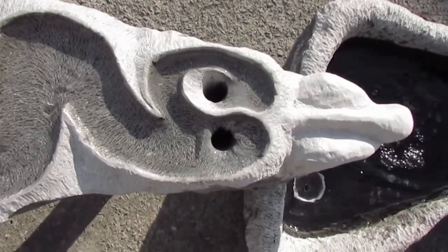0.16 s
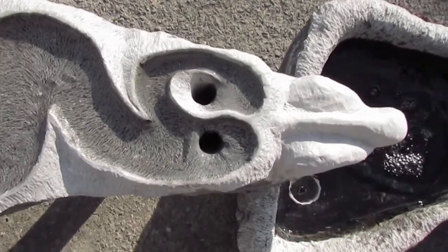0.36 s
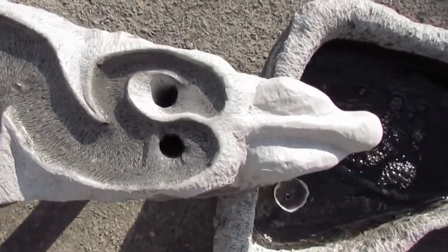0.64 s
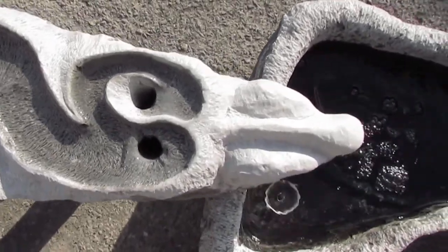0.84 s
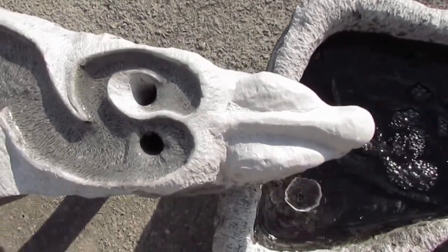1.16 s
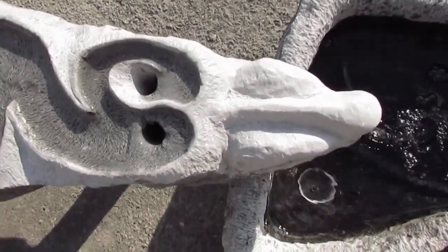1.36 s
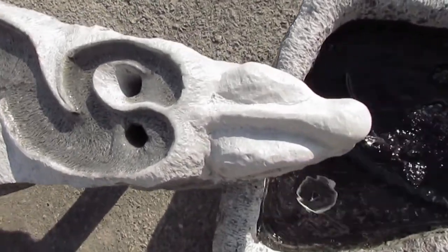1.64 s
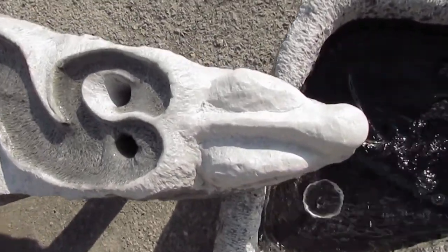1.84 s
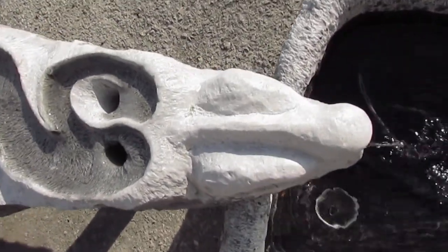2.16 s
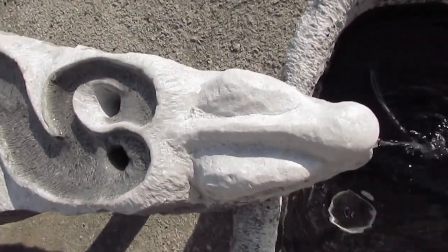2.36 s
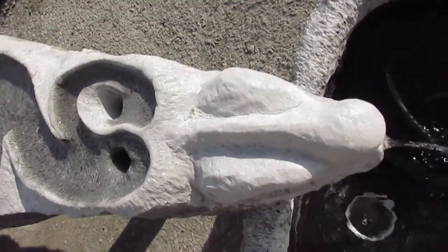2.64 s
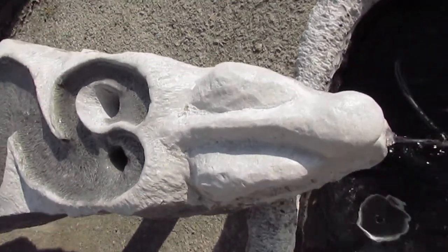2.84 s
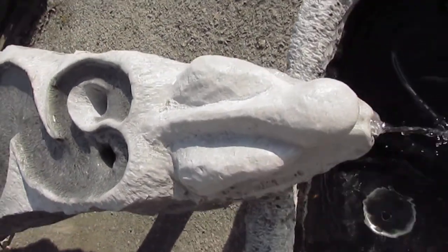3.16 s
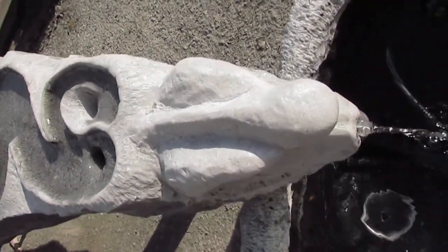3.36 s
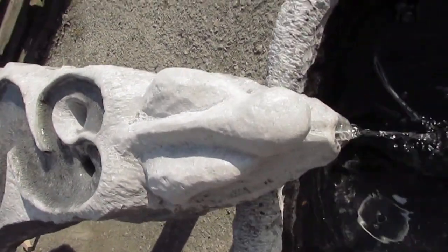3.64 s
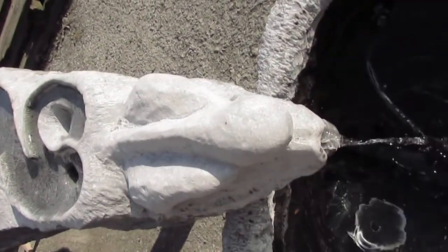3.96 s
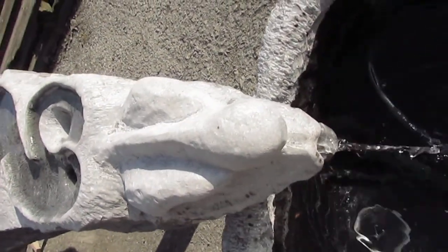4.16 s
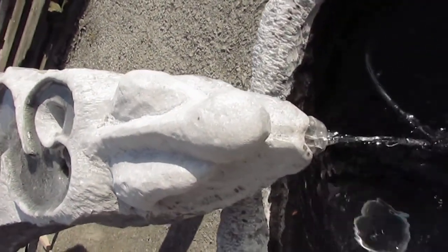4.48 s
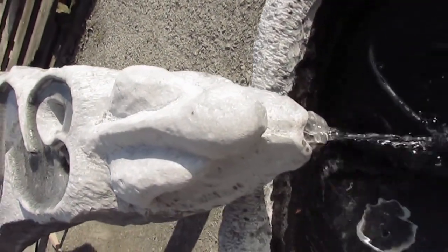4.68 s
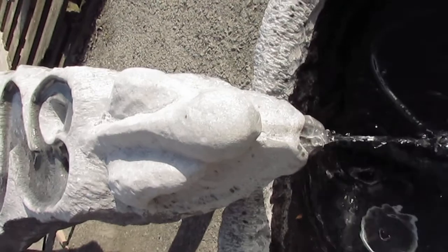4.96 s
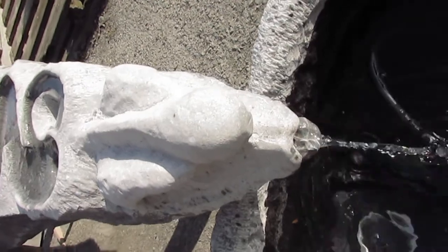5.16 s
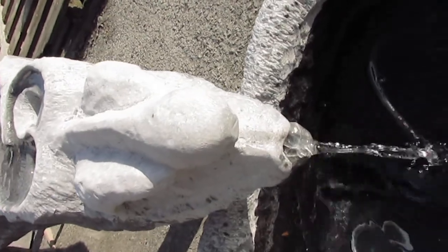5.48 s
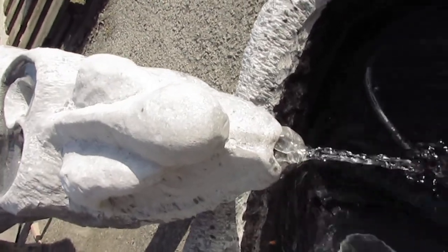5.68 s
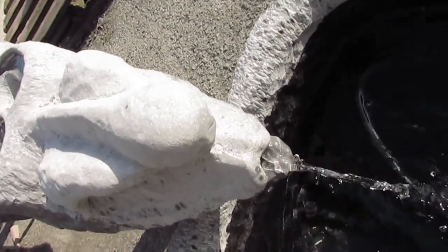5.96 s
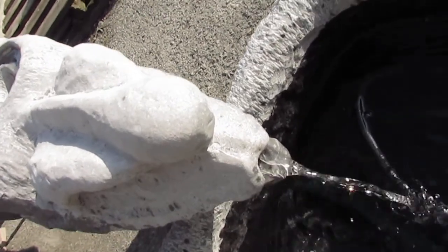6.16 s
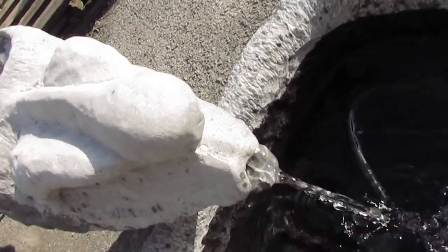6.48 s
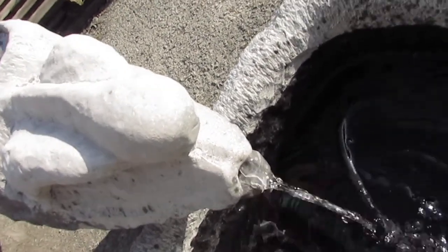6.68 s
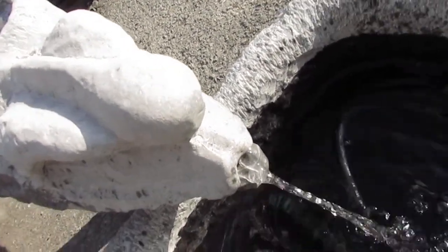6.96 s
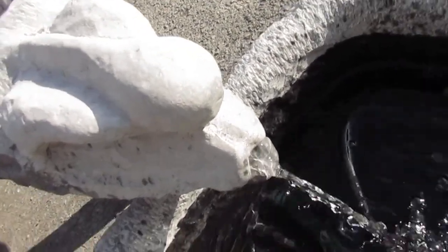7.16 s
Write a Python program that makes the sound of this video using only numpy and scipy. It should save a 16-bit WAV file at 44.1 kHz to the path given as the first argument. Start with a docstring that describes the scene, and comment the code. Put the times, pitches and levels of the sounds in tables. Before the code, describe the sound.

Close outdoor sound of a thin water jet falling from a carved stone spout into a basin. Hollow, rounded plops and a constant run of small gulps sit over light splashing, bright bubble plinks and tiny spray ticks. The splash becomes clearer and brighter as the microphone moves past the spout. Wind thumps hit briefly, heaviest a little after five seconds, then the plops crowd together.

```python
"""Loud hollow plops over a run of small gulps near 500 Hz, in a thin splash: a jet falls from a stone spout.
Plops are decaying sines with stone-hollow modes; bubbles and spray pips are short, mostly rising chirps.
Drops are filtered noise bursts; the splash is noise slaps with bubble clusters, smeared by the basin.
The microphone moves out over the spout, so the splash spectrum crossfades from shaded to open.
Wind is band-shaped noise driven by timed gusts, with push-pull pulses for the eddies that thump."""
import sys
import numpy as np
from scipy import signal
from scipy.fft import rfft, irfft, next_fast_len
from scipy.io import wavfile
from scipy.ndimage import uniform_filter1d, minimum_filter1d, map_coordinates

SR = 44100
rng = np.random.default_rng(int(sys.argv[2]) if len(sys.argv) > 2 else 0)


def wrap_up_sound(samples):
    """Save the sound to the file named by the first command line argument, as 16-bit audio."""
    columns = np.atleast_2d(samples).T
    # keep every value between -1 and 1, then stretch to whole-number steps
    tamed = np.clip(columns, -1, 1)
    steps = np.round(tamed * 32767).astype(np.int16)
    wavfile.write(sys.argv[1], SR, steps)


N = 322812


def amp(db):
    """Decibels to gain."""
    return 10 ** (np.asarray(db) / 20)


def unit(x):
    """Scaled to rms 1."""
    return x / np.sqrt(np.mean(x ** 2) + 1e-20)


def crest(x):
    """Each row scaled to peak 1."""
    return x / np.abs(x).max(axis=-1, keepdims=True)


def fade(t_s, t60_s):
    """Exponential decay by 60 dB in t60_s."""
    return np.exp(-np.log(1000) * t_s / t60_s)


def along(points, hz):
    """Interpolate (freq_hz, value) points on a log frequency axis."""
    point_hz, value = np.transpose(points)
    return np.interp(np.log(hz + 1), np.log(point_hz + 1), value)


def columns(rows):
    """Columns of an event table, each shaped one row per event."""
    return np.transpose(rows)[:, :, None]


def clock():
    """Time of every sample in seconds."""
    return np.arange(N) / SR


def wobble(knots_per_s):
    """Smooth random curve through normally distributed knots."""
    knots = rng.standard_normal(4096)
    return map_coordinates(knots, [np.arange(N) * knots_per_s / SR], mode="wrap")


def filtered(x, response):
    """x times a zero-phase response of frequency."""
    size = next_fast_len(N + SR // 2)
    return irfft(rfft(x, size) * response(np.fft.rfftfreq(size, 1 / SR)), size)[:N]


def noise(spectrum):
    """Coloured noise of rms 1."""
    return unit(filtered(rng.standard_normal(N), lambda hz: amp(along(spectrum, hz))))


def recolour(x, spectrum):
    """x with its broad spectrum replaced by the given one, rms 1."""
    power = np.abs(rfft(x, next_fast_len(N + SR // 2))) ** 2
    broad = np.abs(uniform_filter1d(power, size=4000)) + power.mean() * 1e-4
    return unit(filtered(x, lambda hz: amp(along(spectrum, hz)) / np.sqrt(broad)))


def band(x, lo_hz, hi_hz):
    """Causal band-pass."""
    edges_hz = [lo_hz, min(hi_hz, SR / 2 - 1)]
    return signal.sosfilt(signal.butter(2, edges_hz, "band", fs=SR, output="sos"), x)


def place(start_s, waves):
    """Sum the rows of waves, each from its start time."""
    at = np.round(start_s * SR).astype(int) + np.arange(waves.shape[1])
    return np.bincount(np.maximum(at, 0).ravel(), waves.ravel(), N)[:N]


# outdoor air spectrum: freq_hz, density_db (relative)
AIR_SPECTRUM = [(20, -3.5), (60, -8.5), (150, -10), (300, -16.5), (1000, -17), (4000, -23), (9000, -34),
                (16000, -42.5)]


def air():
    """Still outdoor air: steady coloured noise, rms 1."""
    return noise(AIR_SPECTRUM)


def hiss(centre_s=0.72, width_s=0.051):
    """One brief, soft, high hiss: noise under a Gaussian swell."""
    swell = np.exp(-((clock() - centre_s) / width_s) ** 2)
    return amp(-49.0) * swell * noise([(3000, -34.5), (6000, -4), (9000, 0), (11000, -3), (16000, -32)])


# gusts that buffet the microphone: start_s, hold_s, strength_db
GUST_EVENTS = [(0.40, 0.046, -32.5), (0.57, 0.023, -38), (0.87, 0.033, -34.5), (1.53, 0.03, -37.5),
               (1.82, 0.02, -30), (2.52, 0.22, -38.5), (3.2, 0.18, -36), (3.62, 0.13, -48),
               (4.39, 0.092, -23), (4.59, 0.1, -24.5), (5.265, 0.092, -14), (5.38, 0.047, -19.5),
               (5.56, 0.11, -22.5), (5.72, 0.063, -20), (5.86, 0.12, -36), (6.3, 0.42, -43),
               (6.76, 0.1, -25.5), (6.94, 0.0075, -30.5), (7.27, 0.018, -25.5)]
GUST_RISE_DB_PER_S, GUST_FALL_DB_PER_S = 349, 377
WAKE_DB, WAKE_DB_PER_S = -16.5, 71  # weaker stirred air before and after each gust
BREEZE_DB, BREEZE_SWING_DB = -61, 4.5  # light air between gusts


def gust_strength():
    """Buffeting in dB: each gust rises, holds and falls inside a slower wake, over a light breeze."""
    start_s, hold_s, strength_db = columns(GUST_EVENTS)
    t = clock()
    before_s, after_s = np.maximum(start_s - t, 0), np.maximum(t - start_s - hold_s, 0)
    core_db = strength_db - GUST_RISE_DB_PER_S * before_s - GUST_FALL_DB_PER_S * after_s
    wake_db = strength_db + WAKE_DB - WAKE_DB_PER_S * (before_s + after_s)
    breeze_db = BREEZE_DB + BREEZE_SWING_DB * wobble(5.7)
    return np.maximum(np.maximum(core_db, wake_db).max(axis=0), breeze_db)


# eddies that hit the microphone: centre_s, level_db (before trim), pitch_hz
EDDY_THUMPS = [(0.408, -14, 86), (1.828, -17, 153), (2.69, -23.5, 126), (3.225, -26, 108), (4.398, -7, 193),
               (4.421, -13, 188), (4.457, -12.5, 121), (4.497, -9.5, 142), (4.598, -7, 197),
               (5.281, -6, 203), (5.311, 13.5, 300), (5.326, 9.5, 328), (5.524, -12, 250),
               (5.614, -10.5, 183), (5.728, -4, 228), (5.75, -3.5, 350), (6.765, -5, 255), (6.825, -9, 103),
               (7.28, -15.5, 97)]
# deep wind rumble spectrum: freq_hz, density_db (relative)
RUMBLE_SPECTRUM = [(12, 3), (30, 11.5), (80, 12), (150, -2.5), (250, -21.5), (400, -18), (900, -65.5)]


def wind():
    """Gusts rumble on the microphone; each strong eddy gives a quick push and pull of pressure."""
    centre_s, level_db, pitch_hz = columns(EDDY_THUMPS)
    half = SR // 40
    cycles = pitch_hz * np.arange(-half, half) / SR
    pulses = crest(np.sin(2 * np.pi * cycles) * np.exp(-(cycles / 0.47) ** 2))
    eddies = place(centre_s - half / SR, amp(level_db - 3.0) * pulses)
    gust_db = gust_strength()
    # stronger gusts shed smaller eddies: rumble levels off, then flutter; only roar keeps growing
    rumble = amp(np.minimum(gust_db - 1.0, -33)) * noise(RUMBLE_SPECTRUM)
    flutter_db = np.minimum(1.758 * gust_db + 13.5, -21.5)
    flutter = amp(flutter_db) * unit(band(air(), 102, 266) * amp(6.1 * np.tanh(wobble(45))))
    roar = amp(1.59 * gust_db - 4.5) * unit(band(air(), 216, 590))
    return eddies + rumble + flutter + roar


# diffuse decay of the yard: freq_hz, t60_s
YARD_DECAY = [(200, 0.35), (500, 0.51), (1000, 0.044), (4000, 0.065), (12000, 0.23)]


def yard(x):
    """Short diffuse answer of basin walls and ground: noise tail with frequency-dependent decay."""
    hz, t, bins = signal.stft(rng.standard_normal(SR // 2), SR, nperseg=256)
    tail = signal.istft(bins * fade(t, along(YARD_DECAY, hz)[:, None]), SR, nperseg=256)[1]
    delayed = np.pad(x, (SR // 200, 0))  # 5 ms
    return signal.fftconvolve(delayed, tail / np.linalg.norm(tail))[:N]


# splash flow; each layer adds its own trim: time_s, level_db
SPLASH_FLOW = [(0.0, -46.5), (0.5, -48), (0.9, -43.5), (1.3, -46), (2.8, -47), (3.4, -42.5), (4.9, -42),
               (7.32, -41)]


def flow_db(time_s):
    """Flow level that sets the splash and the layers that follow it."""
    return np.interp(time_s, *np.transpose(SPLASH_FLOW))


VIEW_START_S, VIEW_RISE_S = 2.64, 2.6


def in_view(time_s):
    """How far the splash has come out from behind the spout, 0-1."""
    return np.clip((time_s - VIEW_START_S) / VIEW_RISE_S, 0, 1)


def chirp(start_s, level_db, pitch_hz, cycles, rise, rough, size=800):
    """Bubbles swell, ring unevenly and mostly climb in pitch as they near the surface."""
    t = np.arange(size) / SR
    life, climb = columns(rng.standard_normal((len(start_s), 2)))
    t60_s = cycles * np.exp(0.36 * life) / pitch_hz
    glide_hz = pitch_hz * (1 + rise * (0.505 + climb) * np.minimum(t / t60_s, 1))
    # churning water shakes the bubble wall and blurs its note
    shake = unit(uniform_filter1d(rng.standard_normal(glide_hz.shape), size=40, axis=1))
    phase = 2 * np.pi * np.cumsum(glide_hz * (1 + rough * shake), axis=1) / SR
    swell = 1 - np.exp(-t * pitch_hz / 2)
    return place(start_s, amp(level_db) * crest(np.sin(phase) * fade(t, t60_s) * swell))


def spray(count=700):
    """Fine droplets patter back with needle ticks and trap tiny short-lived bubbles."""
    when, size, tune, hard = columns(rng.random((count, 4)))
    start_s = when * N / SR
    pip_db, pip_hz = 24 * size ** 4 - 11 * tune, 5500 + 7500 * tune
    pips = chirp(start_s, pip_db, pip_hz, cycles=105, rise=0.12, rough=0.12, size=300)
    t = np.arange(SR // 200) / SR
    ticks = rng.standard_normal((count, len(t))) * fade(t, 0.004)
    needles = band(place(start_s, amp(28 * hard ** 5) * ticks), 7100, 16000)
    level_db = flow_db(clock())
    return amp(1.286 * level_db - 1.0) * unit(pips) + amp(level_db - 20.5) * unit(needles)


def glugs(count=300):
    """Middle-sized bubbles drift up with soft, mostly rising notes."""
    when, size, tune = columns(rng.random((count, 3)))
    pitch_hz = 750 * 2 ** (1.7 * tune)
    notes = chirp(when * N / SR, 10 * size, pitch_hz, cycles=79, rise=0.363, rough=0.053, size=3600)
    return amp(flow_db(clock()) - 7) * unit(notes)


STRAY_DB, STRAY_SPREAD_DB = 8.5, 10.5  # lowest offset from the flow level, and range above it


def strays(count):
    """Random moments spread through the scene, with levels that follow the flow."""
    when, size = rng.random((count, 2)).T
    start_s = (np.arange(count) + when) * N / SR / count
    return start_s, flow_db(start_s) + STRAY_DB + STRAY_SPREAD_DB * size


def stray_drops(count=24, smack_db=-4, treble_db=-6.0):
    """Light drops at random moments, as rows for drops()."""
    start_s, level_db = strays(count)
    return np.column_stack([start_s, level_db + smack_db, treble_db + 3 * rng.standard_normal(count)])


# drops on water and stone: start_s, smack_db, treble_db (tick relative to smack, before trim)
DROP_IMPACTS = [(0.8866, -11.5, -45), (1.0201, -34, 6), (1.2674, -31, -5), (1.561, -22, -17),
                (1.6818, -30.5, 2.5), (2.0741, -39.5, -3), (2.5405, -25, -3), (2.8134, -26, -6),
                (2.8771, -29.5, -3), (3.3578, -20, -8.5), (3.5008, -15, -5), (3.6266, -22.5, -7.5),
                (3.7809, -24, -7.5), (3.9213, -34.5, 7), (4.0562, -23, -31), (4.3893, -31, 5),
                (4.632, -22.5, -7), (4.6616, -25.5, -2), (4.7918, -20.5, -6), (4.9172, -20, -22),
                (5.5452, -24, -3), (6.0214, -15, -38), (6.3299, -20, -37), (6.3789, -21.5, -16),
                (6.99, -24, -6), (7.0434, -23, -12)]


def drops():
    """Each impact is a dull smack and a bright tick: noise bursts with a fast and a slower decay."""
    start_s, smack_db, treble_db = columns(np.vstack([DROP_IMPACTS, stray_drops()]))
    t = np.arange(SR // 30) / SR

    def burst(t60_s, tail_db):
        """Noise with a quick decay plus a 23 ms tail."""
        decay = fade(t, t60_s) + amp(tail_db) * fade(t, 0.023)
        return rng.standard_normal((len(start_s), len(t))) * decay

    smack = crest(band(burst(t60_s=0.0046, tail_db=-6.0), 450, 3070))
    tick = crest(band(burst(t60_s=0.00064, tail_db=0), 4700, 8900))
    return place(start_s, amp(smack_db) * smack + amp(smack_db + treble_db + 3.5) * tick)


def stray_bubbles(count=26, shaded_hz=3300, open_hz=2450):
    """Plinks at random moments; their pitches centre lower as the splash comes into view."""
    start_s, level_db = strays(count)
    centre_hz = shaded_hz + (open_hz - shaded_hz) * in_view(start_s)
    return np.column_stack([start_s, level_db, centre_hz * np.exp(0.18 * rng.standard_normal(count))])


# single bubbles that ring out: start_s, peak_db, pitch_hz
BUBBLE_PLINKS = [(0.6947, -23.5, 3980), (0.93, -24, 3320), (0.99, -26, 3670), (1.432, -24.5, 3570),
                 (1.6835, -29, 4970), (2.1085, -25, 3140), (2.1154, -21, 3240), (2.199, -22, 3020),
                 (2.7188, -27.5, 3460), (3.1596, -19, 3480), (3.1899, -16.5, 2830), (3.4997, -16.5, 5030),
                 (4.152, -20.5, 6440), (4.6325, -20.5, 4970), (4.7113, -17, 3860), (4.9166, -23, 2490),
                 (5.1888, -23, 2350), (5.2798, -26, 4520), (5.3789, -19.5, 1850), (6.065, -19.5, 4380),
                 (6.1596, -17, 4380), (6.4377, -23.5, 2420), (6.5803, -21.5, 4200), (6.8895, -24.5, 2400)]


def bubbles():
    """Single plinks, each answered at once by the basin wall."""
    start_s, peak_db, pitch_hz = columns(np.vstack([BUBBLE_PLINKS, stray_bubbles()]))
    wall_delay_s = rng.uniform(0.001646, 0.0052, start_s.shape)
    direct = chirp(start_s, peak_db, pitch_hz, cycles=47, rise=0.05, rough=0.085)
    answer = chirp(start_s + wall_delay_s, peak_db - 7.5, pitch_hz, cycles=32, rise=0.24, rough=0.14)
    return direct + answer


# splash spectrum behind the stone spout: freq_hz, density_db (relative)
SHADED_SPECTRUM = [(410, -20), (700, -7), (997, -12), (1110, -12), (1280, -8.5), (1820, -12), (2730, -2),
                   (3110, -0.5), (3640, -3), (4430, -10.5), (5470, -6), (6400, -14), (13300, -27.5),
                   (16000, -48)]
# splash spectrum in plain view: freq_hz, density_db (relative)
OPEN_SPECTRUM = [(410, -50), (700, -29), (830, -40), (1020, -5.5), (1350, -16), (2400, 3.5), (3030, -10.5),
                 (4490, -2), (5260, -9.5), (6740, -15), (7990, -24.5), (8760, -19.5), (13000, -39),
                 (16000, -45)]


def splash(count=330, cluster=18):
    """The jet breaks into blobs; each lands with a slap and sheds a cluster of small bubbles."""
    start_s = (np.arange(count)[:, None] + 2 * rng.random((count, 1))) * N / SR / count
    weight_db = 5.9 * rng.random((count, 1))
    t = np.arange(SR // 40) / SR
    slap_noise = rng.standard_normal((count, len(t))) * fade(t, 0.03)
    slaps = place(start_s, amp(3.5 * weight_db) * slap_noise)
    delay, loud = columns(rng.random((count * cluster, 2)))
    pitch_hz = np.clip(3700 * np.exp(0.5 * rng.standard_normal(delay.shape)), 1200, 12000)
    born_s = np.repeat(start_s, cluster, axis=0) + 0.028 * delay ** 2
    bubble_db = np.repeat(weight_db, cluster, axis=0) + 20 * loud ** 4
    fizz = chirp(born_s, bubble_db, pitch_hz, cycles=32.6, rise=0.11, rough=0.05)
    water = unit(fizz) + amp(-8.5) * unit(band(slaps, 740, 8300))
    # the stone basin smears the splash into a wash
    water = water + amp(-10) * yard(water)
    view = in_view(clock())
    mix = (1 - view) * recolour(water, SHADED_SPECTRUM) + view * recolour(water, OPEN_SPECTRUM)
    return amp(flow_db(clock()) - 0.5) * mix


# stone hollow modes above its deepest note: freq_hz, level_db (relative), t60_s
HOLLOW_MODES = [(729.5, 0, 0.041), (873, -3.5, 0.045), (1002, -4, 0.047), (1176, -8.5, 0.041),
                (1264, -36, 0.081)]


def gulp(start_s, level_db, pitch_hz, overtone_db, t60_s=0.062, attack_s=0.0048,
         sag=0.0057, sag_s=0.0043, hollow_db=-1):
    """A trapped air pocket swells, settles in pitch and rings the hollow's upper modes."""
    t = np.arange(SR // 6) / SR
    phase = pitch_hz * (t + sag * sag_s * (1 - np.exp(-t / sag_s)))
    life = np.exp(0.28 * rng.standard_normal(start_s.shape))
    wave = np.sin(2 * np.pi * phase) * fade(t, t60_s * life)
    for mode_hz, mode_db, mode_t60_s in HOLLOW_MODES:
        size, detune = columns(rng.standard_normal((len(start_s), 2)))
        ring = np.sin(2 * np.pi * mode_hz * (1 + 0.041 * detune) * t) * fade(t, mode_t60_s)
        wave = wave + amp(overtone_db + hollow_db + mode_db + 2.0 * size) * ring
    return place(start_s, amp(level_db) * wave * (1 - np.exp(-t / attack_s)))


# loudest gulps: start_s, level_db (before trim), pitch_hz, overtone_db (relative)
PLOP_EVENTS = [(0.238, -27, 520, 1), (0.694, -21.5, 597, -7), (0.753, -14.5, 526, -2.5),
               (0.948, -22, 548, -5.5), (1.216, -26, 487, -8), (1.38, -25, 518, -19),
               (1.396, -15.5, 515, -16.5), (1.447, -22.5, 606, -4), (1.56, -22.5, 620, -6),
               (1.863, -22, 558, -29), (2.215, -13, 517, -12.5), (2.448, -14, 507, -14.5),
               (2.718, -25.5, 540, -14), (2.745, -19, 521, -19), (2.856, -11, 478, -39),
               (2.983, -15.5, 440, -12), (3.182, -18.5, 511, -13.5), (3.275, -21, 522, -14),
               (3.502, -10, 517, -21.5), (3.782, -24, 587, 1), (4.058, -18.5, 532, -0.5),
               (4.126, -20, 573, -5), (4.714, -19, 546, -2), (4.778, -24.5, 582, -1.5),
               (4.818, -13, 512, -19.5), (4.852, -25, 529, -8), (5.02, -21.5, 546, -3),
               (5.856, -15, 590, -6), (5.953, -13.5, 549, -16), (6.115, -20, 548, -16),
               (6.332, -15.5, 540, -12), (6.402, -12.5, 532, -26), (6.447, -10, 497, -16),
               (6.485, -11, 492, -13), (6.553, -20.5, 556, -5.5), (6.667, -16, 510, -15),
               (6.765, -10.5, 520, -13.5), (6.953, -18.5, 534, -12), (7.044, -16, 505, -25),
               (7.079, -11.5, 525, -30), (7.122, -13.5, 516, -18.5), (7.193, -20.5, 530, -9)]
# run of small gulps: time_s, level_db (before trim)
SMALL_GULP_LEVEL = [(0, -44), (1.2, -42), (2.0, -41), (3.0, -38.5), (3.8, -38), (4.45, -34.5), (5.2, -39),
                    (6.5, -33), (7.3, -41)]
SMALL_GULP_HZ, SMALL_GULP_SPREAD = 530.6, 0.0867  # hollow's deepest note, relative scatter


def gurgle(count=190):
    """Loud gulps, each opened by a wet splat, over an unbroken run of small ones."""
    start_s, level_db, pitch_hz, overtone_db = columns(PLOP_EVENTS)
    start_s = start_s - 0.001
    loud = gulp(start_s, level_db + 3.5, pitch_hz, overtone_db)
    t = np.arange(SR // 20) / SR
    splat = crest(band(rng.standard_normal((len(start_s), len(t))) * fade(t, 0.032), 760, 3500))
    splats = place(start_s, amp(level_db + 0.91 * overtone_db - 9) * splat)
    when, size, tune, colour = columns(rng.uniform(-1, 1, (count, 4)))
    small_s = np.abs((np.arange(count)[:, None] + 0.7 * when) * N / SR / count)
    small_hz = SMALL_GULP_HZ * np.exp(SMALL_GULP_SPREAD * tune)
    small = gulp(small_s, 5.0 * size, small_hz, -8 + 4 * colour, t60_s=0.096, attack_s=0.00088)
    small_db = np.interp(clock(), *np.transpose(SMALL_GULP_LEVEL)) - 1.0
    return loud + splats + amp(small_db) * unit(small)


def scene():
    """Water, its echo, wind, a hiss and still outdoor air."""
    gulps = gurgle()
    water = gulps + bubbles() + glugs() + drops() + splash() + spray()
    # the stone hollow holds on to the deep notes longest
    echo = amp(-21.5) * yard(water) + amp(-19.5) * yard(gulps)
    return (water + echo + wind() + hiss() + amp(-53.0) * air())[None]


CEILING_DB, RECOVERY_DB_PER_S = -0.3, 67


def limiter(x):
    """Ducks just ahead of a peak that passes the ceiling, then recovers at a steady rate."""
    over_db = np.maximum(20 * np.log10(np.abs(x) + 1e-9) - CEILING_DB, 0)
    recovered_db = RECOVERY_DB_PER_S * clock()
    gain_db = recovered_db - np.maximum.accumulate(over_db + recovered_db)
    return x * amp(uniform_filter1d(minimum_filter1d(gain_db, size=200), size=200))


TOP_HZ = 15900


def record(dry):
    """Limits the peaks, adds a faint, slightly wavering high whine and cuts everything from TOP_HZ up."""
    whine_hz = 11810 + 16 * wobble(30)
    whine = amp(-74) * np.sin(2 * np.pi * np.cumsum(whine_hz) / SR)
    return filtered(limiter(dry[0]) + whine, lambda hz: hz < TOP_HZ)[None]


dry = scene()
out = record(dry)
wrap_up_sound(out)
```